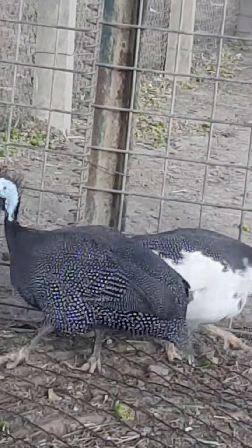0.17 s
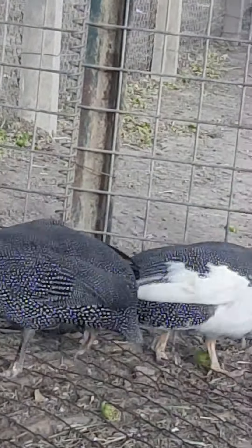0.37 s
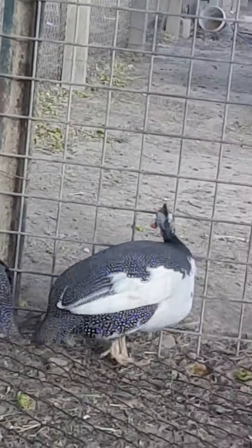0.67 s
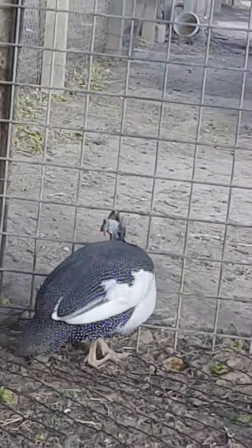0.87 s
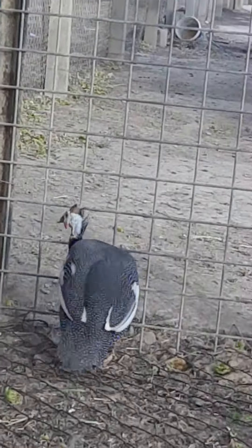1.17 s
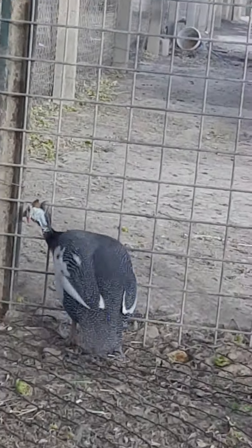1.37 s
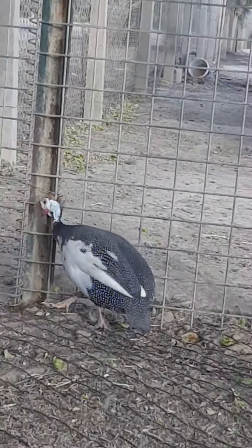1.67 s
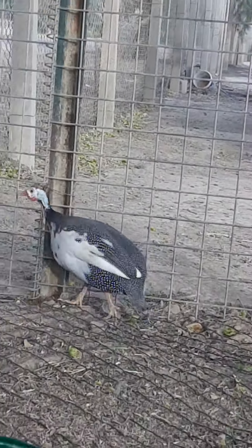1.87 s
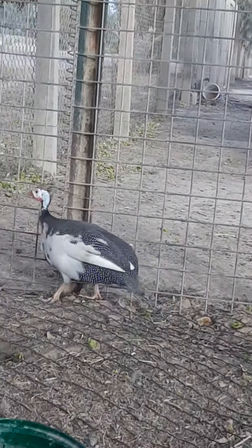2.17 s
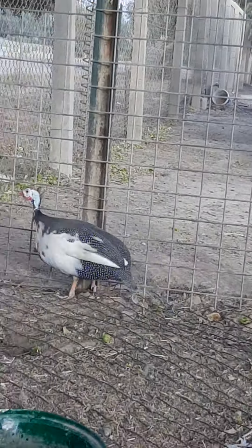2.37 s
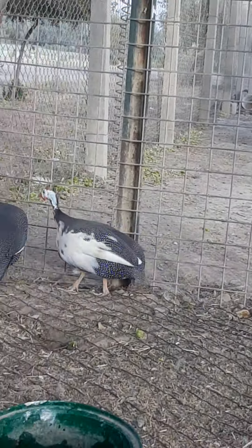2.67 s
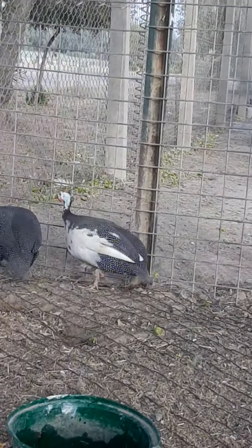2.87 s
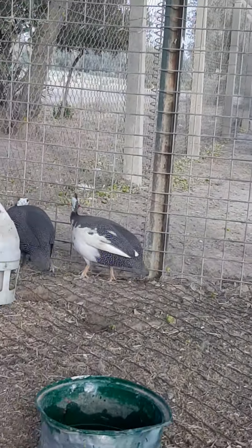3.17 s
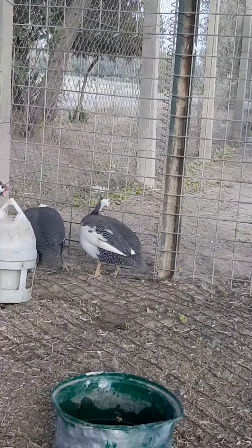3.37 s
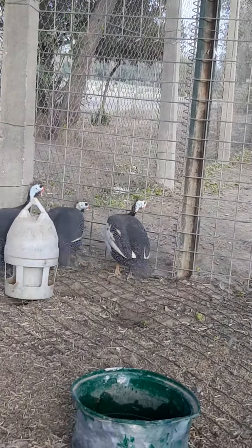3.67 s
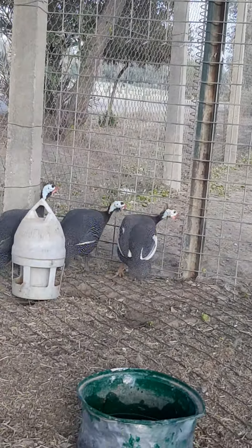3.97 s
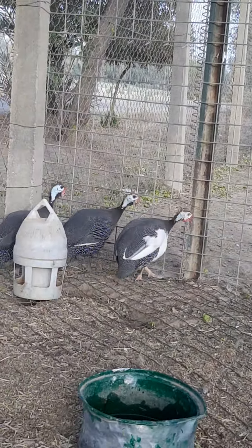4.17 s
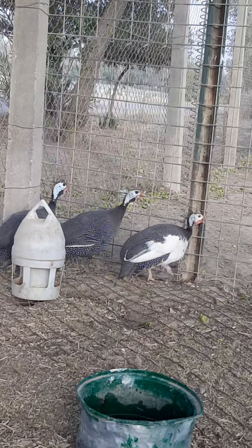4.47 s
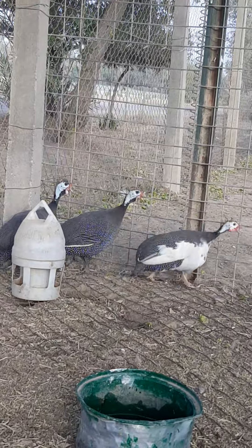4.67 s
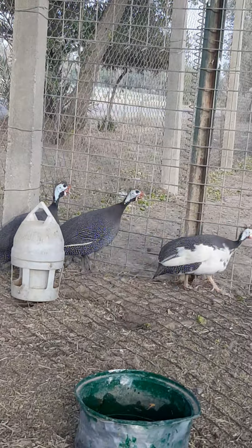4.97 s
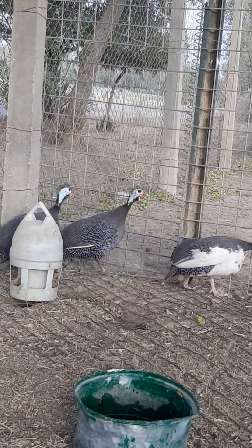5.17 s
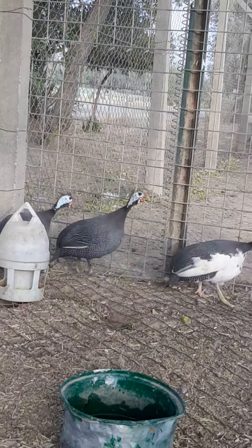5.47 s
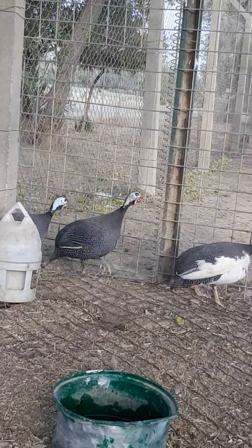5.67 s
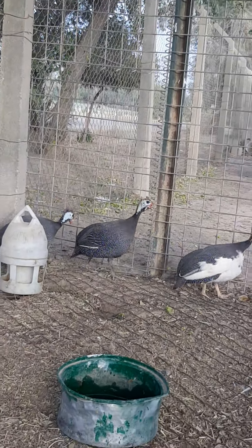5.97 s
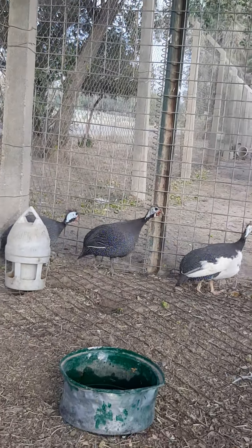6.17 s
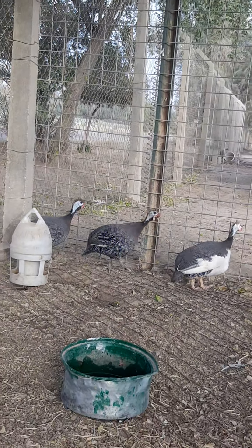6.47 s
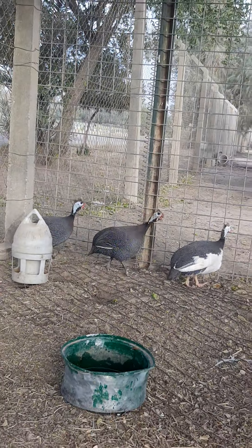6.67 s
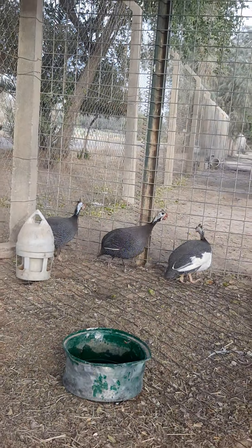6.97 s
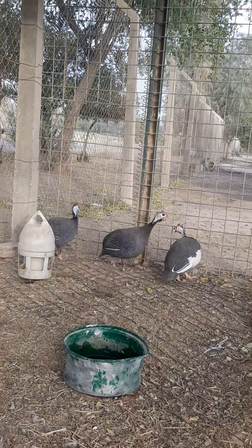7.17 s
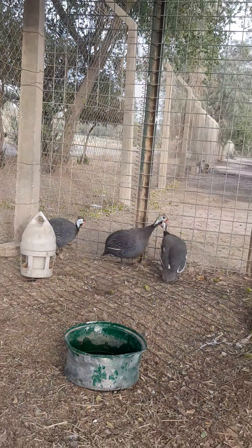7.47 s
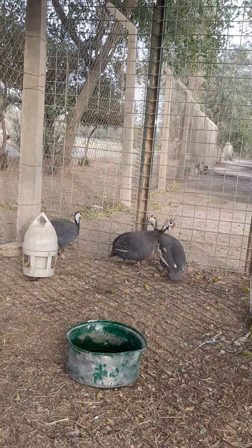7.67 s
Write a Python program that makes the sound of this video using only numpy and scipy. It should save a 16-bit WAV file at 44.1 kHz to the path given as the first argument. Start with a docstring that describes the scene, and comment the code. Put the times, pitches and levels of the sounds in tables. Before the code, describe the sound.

Outdoors in a wire pen, a lumpy distant traffic rumble lies under faint scuffs, a dull knock and a small bird's brief twitter. Single sharp guineafowl cheks come sparsely, then closer together. Just before four seconds a quick swelling rattle of whistled ticks breaks into a loud, raspy, irregular chorus that continues to the end. Close handheld stereo microphone, calls brighter on the right, short scattered echoes.

```python
"""Guineafowl in a wire pen, brighter on the right: single harsh cheks, a rattle, then a loud chorus.
Each note is a rough low buzz of the syrinx plus a piercing whistle; the buzz rings through the windpipe.
Two dull sounds fade at the start; then come scuffs and clicks of gritty noise over thumps, and one dull knock.
A small bird twitters in sliding tones and a thin two-line squeak sounds far off.
Distant traffic is a lumpy rumble of shaped noise, with a faint hiss beside it."""
import sys
import numpy as np
from scipy import signal
from scipy.fft import rfft, irfft, next_fast_len
from scipy.io import wavfile
from scipy.ndimage import uniform_filter1d, map_coordinates

SR = 44100
rng = np.random.default_rng(int(sys.argv[2]) if len(sys.argv) > 2 else 0)


def to_wav(s):
    """Save 16-bit WAV."""
    ch = np.atleast_2d(s).T  # columns
    pcm = np.round(np.clip(ch, -1, 1) * 32767)  # PCM
    wavfile.write(sys.argv[1], SR, pcm.astype(np.int16))


N = 345303

HOLLOW_HZ = 1110  # the windpipe sings near here, strongest in the single cheks
CHEK_ORDER = 4  # whistle cycles to one buzz pulse, in cheks and rattle
WHISTLE_NEAR_HZ = 1780  # the chorus whistle locks to the buzz overtone nearest to this
# Short whistled ticks that lead into the chorus: start, spacing and length in seconds, then how many
RATTLE_S, RATTLE_GAP_S, RATTLE_TICK_S, RATTLE_COUNT = 3.872, .0215, 0.0089, 12
RATTLE_DB, RATTLE_GROWS_DB, RATTLE_TOP_DB = -42, 2.5, -25  # relative level: first tick, gain a tick, ceiling
RATTLE_HZ, RATTLE_CLIMB_HZ, RATTLE_TOP_HZ = 1500, 34.8, 1628  # whistle: first tick, rise a tick, ceiling
RATTLE_WHISTLE_DB, RATTLE_BRIGHT_DB = 1, 12
CHORUS_WHISTLE_DB, CHORUS_BRIGHT_DB = -15, 7
LOUD_DB, BRIGHTER = -15.5, 0.37  # chorus brightness changes by this many dB for each dB above or below LOUD_DB
SAG_PER_S = 0.71  # pitch falls by this share a second
SCOOP, SCOOP_S = 0.0623, 0.00574  # a note starts low by this share and recovers with this time constant
FLUTTER_DB = 1  # unsteady level inside a note
CHEK_SHAPE, RATTLE_SHAPE, CHORUS_SHAPE = (0.015, 91), (0.011, -300), (0.014, -32)  # (attack s, swell dB per s)
BLUR_RATE = 160  # knots per s of the random level fed to the tail, so that its tones do not ring


def amp(db):
    """dB to gain."""
    return 10 ** (np.asarray(db) / 20)


def unit(x):
    """Scaled to rms 1."""
    return x / np.sqrt(np.mean(x ** 2) + 1e-20)


def along(points, hz):
    """Reads (Hz, value) points at any frequency, on a log axis."""
    f, v = np.transpose(points)
    return np.interp(np.log(hz + 1), np.log(f + 1), v)


def curves(rows):
    """One value per sample for each column after the time."""
    s, *cols = np.transpose(rows)
    return [np.interp(np.arange(N) / SR, s, c) for c in cols]


def wobble(rate, size=N):
    """A smooth random curve, rate knots a second."""
    knots = rng.standard_normal(int(size * rate / SR) + 4)
    return map_coordinates(knots, [np.arange(size) * rate / SR])


def filtered(x, response):
    """x times a complex response of frequency."""
    m = next_fast_len(x.shape[-1] + 4096)
    return irfft(rfft(x, m) * response(np.fft.rfftfreq(m, 1 / SR)), m)[..., :x.shape[-1]]


def modes(table):
    """Causal response of resonances (Hz, width Hz, dB), added with alternating sign."""
    def response(f):
        return sum((-1) ** k * amp(db) * 1j * f * width / (hz * hz - f * f + 1j * f * width)
                   for k, (hz, width, db) in enumerate(table))
    return response


def add(track, s, sound):
    """Mixes a sound in at time s."""
    part = track[..., round(s * SR):round(s * SR) + sound.shape[-1]]
    part += sound[..., :part.shape[-1]]


def birds():
    """The calls, duller on the left, with the tail of the pen."""
    # Left against right. Each row: frequency in Hz, left-minus-right level in dB
    side_tilt = [(60, -8), (380, 3.5), (2380, -3.5), (15000, -14)]
    calls = flock()
    blurred = calls.mean(0) * unit(wobble(BLUR_RATE))
    near = calls + amp(-12) * pen(blurred, t60_scale=.8)
    halves = np.array([[1], [-1]]) / 2
    return amp(2.5) * filtered(near, lambda hz: amp(halves * along(side_tilt, hz)))


def flock(release=.04, scatter=.022):
    """Two buzzes ring through the windpipe, a whistle on top; each note has its own random early echoes."""
    # Windpipe with the beak closed. Each row: resonance in Hz, width in Hz, gain in dB
    low_pipe = [(1230, 400, -14), (1677, 451, -1), (2223, 438, 1)]
    # Resonances opened by the beak, before the shifts below. Each row: Hz, width in Hz, gain in dB
    high_pipe = [(3540, 960, -6.5), (4144, 306, 2), (4935, 860, -1.5), (7140, 3750, -10.5),
                 (11130, 16000, -24)]
    # Whistle fundamental and its overtones in turn: relative level in dB
    whistle_levels = [0, -4, -10, -15]
    # Voice over time. Each row: time in seconds, noise share of the buzz (0-1),
    # hollow tone in dB against the note, neck length as a factor
    voice = [(0, 0.83, -17, 1.17), (3.85, 0.12, -15.5, 1.176), (4.15, 0.37, -30.5, 1.13),
             (6.19, 0.72, -47, 0.95), (6.23, 0.15, -5, 1.02), (6.32, 0.15, -35, 1.04),
             (6.35, 0.67, -51, 0.97)]

    def smear(f):
        """The treble of each pulse trails out of the long pipe."""
        return np.exp(-1j * (f / 650) ** 2 / (1 + f / 9000))

    out = np.zeros((2, N))
    share, hollow, necks = curves(voice)
    share = np.clip(share, 0, 1)
    for s, length, db, buzz_hz, whistle_hz, whistle_db, bright_db, (rise, swell) in notes():
        t = np.arange(round((length + release) * SR)) / SR
        n = len(t)
        rough = share[round((s + length / 2) * SR)]
        hollow_db, stretch = hollow[round(s * SR)], necks[round(s * SR)]

        # pitch scoops up, then sags with the pressure
        glide = 1 + SAG_PER_S * (length / 2 - t) - SCOOP * np.exp(-t / SCOOP_S)
        pulses, breath, ground = buzz(buzz_hz * glide, rough)
        # a second buzz sounds with each note, higher under low notes and lower under high ones
        other, _, other_ground = buzz((810 - buzz_hz) * glide, rough)
        other = rough * other
        # the fundamentals break up
        ground = amp(5 * wobble(35, n)) * ground + rough * amp(6 * wobble(25, n)) * other_ground

        shift = 1 + 0.022 * rng.standard_normal(2)  # small random shift of the resonances from note to note
        low_source = pulses + .5 * other + .5 * np.sqrt(rough) * breath
        low = filtered(low_source, lambda f: modes(low_pipe)(f * shift[0]) * f / (f - 900j))
        high_source = pulses + other + 2 * np.sqrt(rough) * breath
        high = filtered(high_source, lambda f: modes(high_pipe)(f * shift[1] * stretch) * smear(f))
        turn = 2 * np.pi * np.cumsum(whistle_hz * glide * (1 + .025 * wobble(90, n))) / SR
        whistle = sum(amp(level + 0.93 * wobble(123.0, n)) * np.sin((k + 1) * turn)
                      for k, level in enumerate(whistle_levels))
        hollow_turn = 2 * np.pi * np.cumsum(HOLLOW_HZ * shift[0] * glide) / SR

        body = unit(unit(low) + amp(bright_db) * unit(high))
        note = unit(body + amp(whistle_db + 4) * whistle)
        note = note + amp(-28.0) * ground + amp(hollow_db) * np.sin(hollow_turn)
        shape_db = db + swell * (np.minimum(t, length) - length / 2) + FLUTTER_DB * wobble(44.0, n)
        shape_db = shape_db - 60 * np.maximum(t - length, 0) / release
        attack = np.sin(np.pi / 2 * np.minimum(t / rise, 1)) ** 2
        note = attack * amp(shape_db) * note

        # echoes off ground, bodies and posts; small things scatter no bass
        paths = rng.standard_normal((2, 800)) * amp(-60 * np.arange(800) / (scatter * SR))
        paths = signal.lfilter([1, -1], [1, -.9], paths)
        paths = amp([[2], [-2]]) * paths / np.linalg.norm(paths, axis=1, keepdims=True)
        paths[[0, 1], [3, 0]] += 1  # direct sound, three samples later on the left
        heard = signal.fftconvolve(note[None], paths, axes=1)
        add(out, s, heard * np.linalg.norm(note) / np.linalg.norm(heard, axis=1, keepdims=True))
    return out


def notes():
    """Every call as (s, length, dB, buzz Hz, whistle Hz, whistle dB, brightness dB, shape)."""
    # Single cheks. Each row: start in seconds, length in seconds, relative level in dB,
    # whistle in Hz before its glide, relative whistle level in dB, brightness in dB
    chek_rows = [(.463, 0.025, -36, 1516, -2.5, 8), (1.497, 0.026, -24, 1709, -6, 7),
                 (1.819, 0.028, -24, 1643, -3.5, 3.5), (2.19, .024, -22, 2131, -3.5, 16),
                 (3.025, 0.028, -26, 1665, -5.5, 2), (3.29, 0.024, -24.5, 1606, -3.5, 3.5),
                 (3.57, .026, -20.5, 1649, -12.5, 12), (3.795, .025, -25, 1566, -9, 1),
                 (3.828, 0.014, -23, 1694, -5, 1)]
    # Chorus notes. Each row: start in seconds, length in seconds, relative level in dB, buzz in Hz at mid-note
    chorus_rows = [(3.979, 0.036, -20, 422), (4.011, 0.026, -17, 385), (4.041, 0.019, -23.5, 366),
                   (4.069, .016, -20.5, 411), (4.09, 0.025, -19, 405), (4.115, 0.071, -19.5, 368.6),
                   (4.182, 0.077, -17.5, 422.8), (4.261, 0.06, -18, 444.3), (4.319, 0.036, -22, 426.6),
                   (4.357, 0.054, -19, 424.2), (4.399, 0.032, -22.5, 352.6), (4.494, 0.0567, -18, 438),
                   (4.585, 0.038, -21, 354), (4.631, 0.019, -21, 391), (4.677, 0.065, -17.5, 443.3),
                   (4.765, .044, -20.5, 353), (4.834, .06, -17, 449), (4.933, 0.084, -18, 441.4),
                   (5.018, 0.056, -21.5, 363.4), (5.107, 0.083, -17, 441.4), (5.192, 0.024, -20.5, 351),
                   (5.257, 0.1, -17.5, 465.2), (5.377, 0.042, -20.5, 362.5), (5.414, 0.069, -18, 464.6),
                   (5.476, 0.11, -18, 445.4), (5.591, 0.059, -17, 479.7), (5.649, 0.057, -20.5, 486.4),
                   (5.696, .15, -19.5, 441), (5.847, 0.044, -22.5, 415), (5.894, 0.078, -19, 447.4),
                   (5.968, 0.036, -21.5, 462.5), (6, 0.13, -19, 434.4), (6.11, 0.12, -20, 379),
                   (6.219, 0.11, -32, 367), (6.333, .1, -18.5, 447.4), (6.459, .055, -19, 447),
                   (6.57, 0.048, -22, 424), (6.627, 0.063, -20.5, 428.4), (6.685, 0.15, -19, 439.3),
                   (6.818, 0.066, -21, 431.7), (6.896, 0.022, -33, 460), (6.921, 0.023, -34, 457),
                   (6.942, .03, -34.5, 444), (6.969, 0.027, -27.5, 415), (6.993, 0.092, -19, 446),
                   (7.096, 0.037, -22.5, 449), (7.185, 0.028, -22, 428), (7.209, 0.048, -17.5, 471.5),
                   (7.323, 0.072, -19.5, 452), (7.395, 0.064, -21, 443), (7.453, 0.041, -19, 387.7),
                   (7.563, 0.14, -19, 450.7), (7.699, 0.074, -24, 464.4), (7.768, 0.06, -17, 451.6)]
    calls = []
    for s, length, db, hz, whistle_db, bright_db in chek_rows:
        calls.append((s, length, db, hz / CHEK_ORDER, hz, whistle_db, bright_db, CHEK_SHAPE))
    for k in range(RATTLE_COUNT):
        s = RATTLE_S + k * RATTLE_GAP_S
        db = min(RATTLE_DB + k * RATTLE_GROWS_DB, RATTLE_TOP_DB)
        hz = min(RATTLE_HZ + k * RATTLE_CLIMB_HZ, RATTLE_TOP_HZ)
        calls.append((s, RATTLE_TICK_S, db, hz / CHEK_ORDER, hz,
                      RATTLE_WHISTLE_DB, RATTLE_BRIGHT_DB, RATTLE_SHAPE))
    for s, length, db, hz in chorus_rows:
        whistle_hz = hz * round(WHISTLE_NEAR_HZ / hz)
        bright_db = CHORUS_BRIGHT_DB + BRIGHTER * (db - LOUD_DB)
        calls.append((s, length, db, hz, whistle_hz, CHORUS_WHISTLE_DB, bright_db, CHORUS_SHAPE))
    return calls


def buzz(hz, rough, jitter=.022, halving=.4):
    """Uneven syrinx pulses, alternately strong and weak at times, breath gated once a cycle, and a fundamental."""
    n = len(hz)
    cycle = 2 * np.pi * (rng.random() + np.cumsum(hz * (1 + jitter * wobble(310.2, n))) / SR)
    pulses = np.exp(300 * (np.cos(cycle) - 1))
    breath = np.exp(np.cos(cycle)) * rng.standard_normal(n)
    uneven = 1 + np.tanh(halving * wobble(60.2, n)) * np.cos(cycle / 2)
    tone = np.sqrt(1 - rough) * unit(uneven * pulses - pulses.mean())
    return tone, unit(uneven * breath), np.cos(cycle)


def pen(x, t60_scale):
    """Scattered answer of posts, wire and ground: decaying noise, unlike on the two sides."""
    # Decay of the pen. Each row: frequency in Hz, 60 dB decay time in seconds at a t60_scale of 1
    decay = [(400, 0.58), (3000, 0.42), (14000, 0.34)]
    hz, t, z = signal.stft(rng.standard_normal((2, SR // 3)), SR, nperseg=128)
    fade = amp(-60 * t / (t60_scale * along(decay, hz)[:, None]))
    tail = signal.istft(z * fade, SR, nperseg=128)[1]
    return signal.fftconvolve(x[None], tail / np.linalg.norm(tail[0]), axes=1)[:, :N]


def scuffs():
    """Each contact is spiky resonant grit over a dull thump; one knock is a decaying sine that drops in pitch."""
    # Dull fading sounds at 1 and 1.7 kHz at the start, perhaps a far chek's tail; then scuffs and clicks.
    # Each row: start in seconds, grit level in dB, thump level in dB, thump in Hz,
    # decay time in seconds, left-minus-right level in dB
    contacts = [(0, -64, -45.5, 1004, 0.14, 28), (0, -71, -48, 1700, .06, 23),
                (0.278, -48.5, -72, 298, 0.065, -3), (0.604, -51, -43.5, 235, .035, 29.5),
                (0.679, -73, -47.5, 725, 0.072, 33), (2.129, -47.5, -52, 298, 0.019, -6),
                (2.596, -40.5, -33.5, 316, 0.0043, 19), (3.708, -49, -43.5, 242, 0.075, 13.5),
                (4.76, -45, -47.5, 200, 0.085, 15.5)]
    # One dull knock: start in seconds, level in dB before panning, settled pitch in Hz, 60 dB decay in seconds
    knock = (1.1205, -19, 330, .016)
    out = np.zeros((2, N))
    for s, grit_db, thump_db, thump_hz, length, pan_db in contacts:
        t = np.arange(round((3 * length + 0.036) * SR)) / SR
        shape = (1 - np.exp(-t / 0.00026)) * np.exp(-(t / length) ** 2)
        grit = rng.standard_normal((2, len(t))) * amp(2.2 * wobble(490, len(t)))
        grit = unit(filtered(grit, modes([(2270, 6000, 5.0), (5600, 2700, 10.5), (12400, 2000, -4.0)])))
        thump_mode = modes([(thump_hz, 250 + .1 * thump_hz, 0)])
        thump = unit(filtered(rng.standard_normal(len(t)), lambda f: thump_mode(f) ** 2))
        contact = shape * (amp(grit_db) * grit + amp(thump_db) * thump)
        add(out, s, contact * amp([[pan_db / 2], [-pan_db / 2]]))
    s, db, hz, t60 = knock
    t = np.arange(1500) / SR
    turn = 2 * np.pi * hz * (t + .0006 * (1 - np.exp(-t / .001)))
    add(out, s, amp(db - 60 * t / t60) * np.sin(turn) * amp([[5], [-9]]))
    return out


def far_calls():
    """Sliding whistles of a small bird and a thin two-line squeak, both plain sines with the tail of the pen."""
    # Strokes of the small bird. Each row: start in seconds, length in seconds, from Hz, to Hz, relative level in dB
    strokes = [ (.09, 0.026, 4050, 3480, -49.5), (.115, 0.029, 2980, 4360, -49),
               (.148, 0.016, 3550, 2730, -53), (1.266, 0.029, 4800, 3220, -53),
               (1.297, .035, 3100, 4460, -53), (1.333, 0.039, 4150, 2520, -53),
               (3.749, 0.029, 2990, 4150, -38.5)]
    # Path of the squeak. Each row: time in seconds, lower line in Hz, relative level in dB
    squeak = [(0.76, 1247, -60.5), (0.882, 1256, -59), (1.09, 1332, -65)]
    out = np.zeros(N)
    for s, length, from_hz, to_hz, db in strokes:
        n = round(length * SR)
        turn = 2 * np.pi * np.cumsum(np.linspace(from_hz, to_hz, n)) / SR
        add(out, s, amp(db) * np.hanning(n) ** .5 * np.sin(turn))
    hz, db = curves(squeak)
    t = np.arange(N) / SR
    turn = 2 * np.pi * np.cumsum(hz) / SR
    on = uniform_filter1d(1. * ((t > squeak[0][0]) & (t < squeak[-1][0])), size=900)
    lines = np.sin(turn) + amp(-8) * np.sin(3 / 2 * turn)  # the weaker line lies a fifth above
    out += on * amp(db + 5.5 + 1.7 * wobble(39)) * lines
    return out * amp([[-1], [1]]) + amp(-2.5) * pen(out, t60_scale=0.56)


def air():
    """Lumpy distant rumble, partly shared between the sides, and a faint hiss unrelated between them."""
    # Background over time: the rumble sinks as the chorus starts, the hiss leaps up and then fades.
    # Each row: time in seconds, rumble in dB, hiss in dB, both before their random swells
    levels = [(0, -42, -50), (1, -46.5, -54.5), (3.85, -48, -54.5), (4.15, -54.5, -43), (7.83, -54, -56)]
    # Rumble spectrum. Each row: frequency in Hz, relative gain in dB
    rumble_tone = [(15, -71), (25, -32), (50, -1.5), (91, -0.5), (374, -13.5), (1200, -23.5), (1560, -36),
                   (2640, -120)]
    # Hiss spectrum. Each row: frequency in Hz, relative gain in dB
    hiss_tone = [(500, -67), (900, -7), (3000, -14), (6000, -18), (12000, -27), (16500, -11)]
    shared, left, right = rng.standard_normal((3, N))
    rumble_noise = shared + 1.23 * np.array([left, right])
    rumble = unit(filtered(rumble_noise, lambda hz: amp(along(rumble_tone, hz))))
    hiss = unit(filtered(rng.standard_normal((2, N)), lambda hz: amp(along(hiss_tone, hz))))
    rumble_db, hiss_db = curves(levels)
    rustle = amp(2 * wobble(5) + 1.5 * np.array([wobble(25), wobble(25)]))
    lumps = amp(1.6 * wobble(3.536) + 1.46 * wobble(13))
    return amp(rumble_db) * lumps * rumble * amp([[1], [-1]]) + amp(hiss_db) * rustle * hiss


def scene():
    """All sources."""
    return birds() + scuffs() + far_calls() + air()


def record(dry):
    """Treble shaping with a deep notch, a soft ceiling, then the band limit."""
    # Treble response. Each row: frequency in Hz, gain in dB
    treble = [(6500, 2), (7600, -5), (8600, -33), (9600, -10.5), (11500, 0.5), (16000, -4.5)]
    x = filtered(dry, lambda hz: amp(along(treble, hz)))
    x = x / (1 + np.abs(x) ** 6) ** (1 / 6)
    return filtered(x, lambda hz: hz < 15900)


dry = scene()
out = record(dry)
to_wav(out)
```